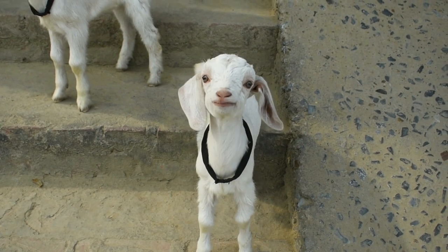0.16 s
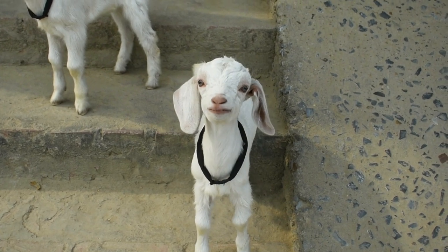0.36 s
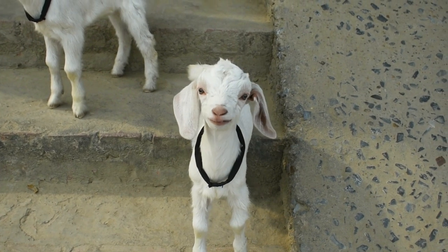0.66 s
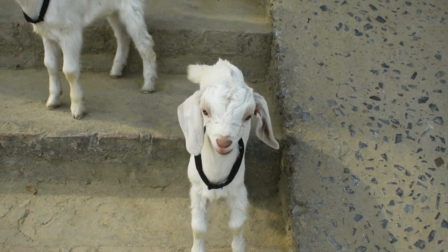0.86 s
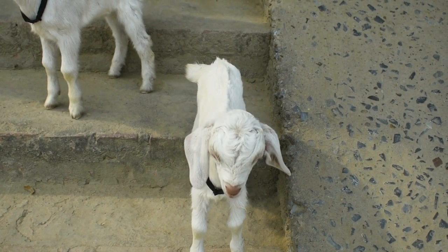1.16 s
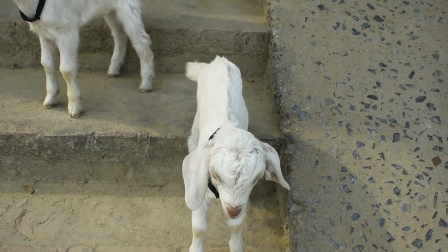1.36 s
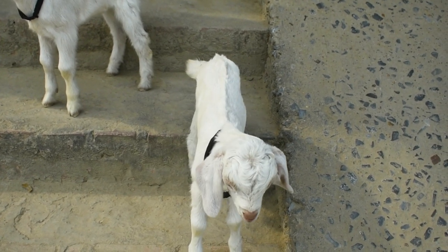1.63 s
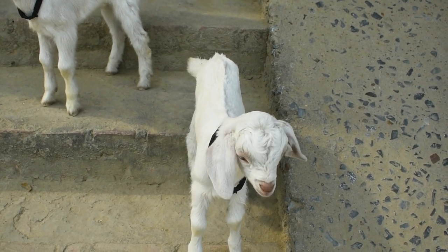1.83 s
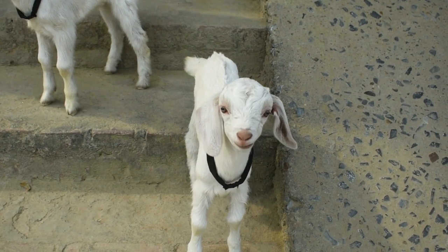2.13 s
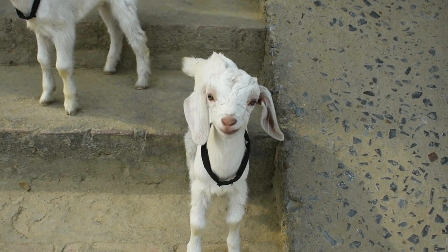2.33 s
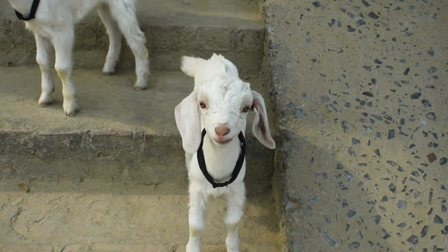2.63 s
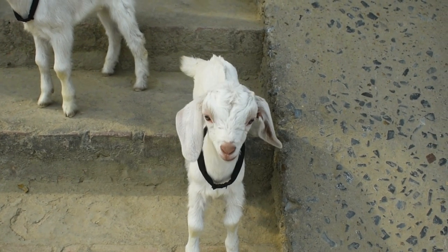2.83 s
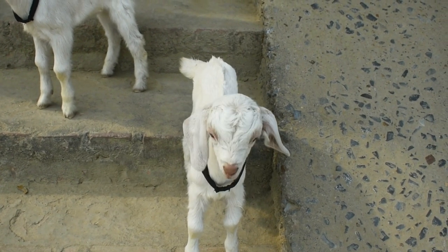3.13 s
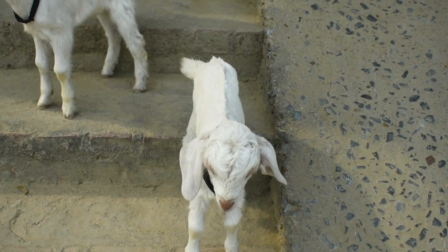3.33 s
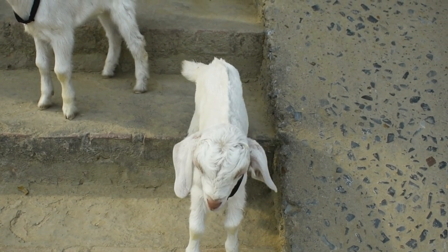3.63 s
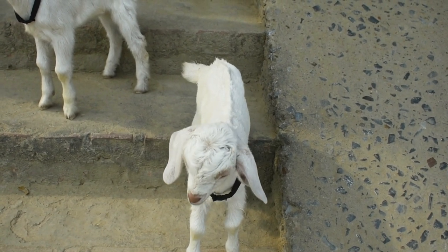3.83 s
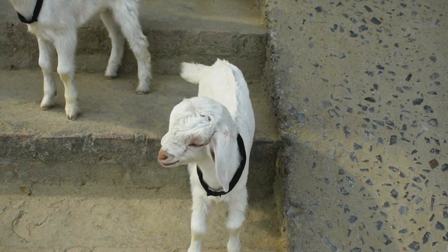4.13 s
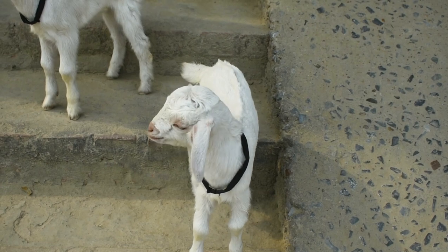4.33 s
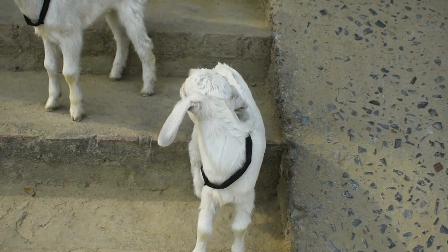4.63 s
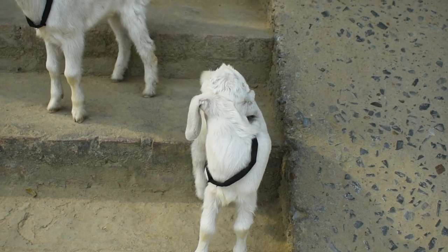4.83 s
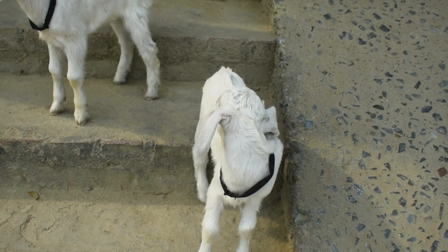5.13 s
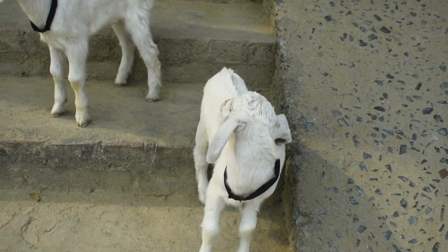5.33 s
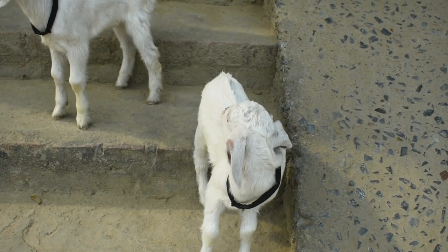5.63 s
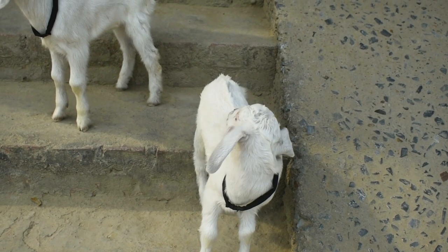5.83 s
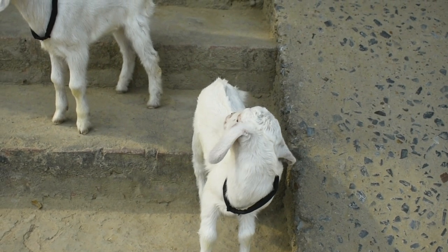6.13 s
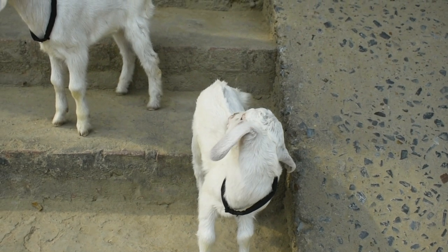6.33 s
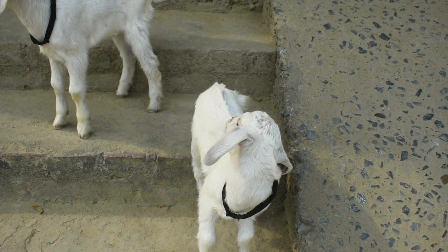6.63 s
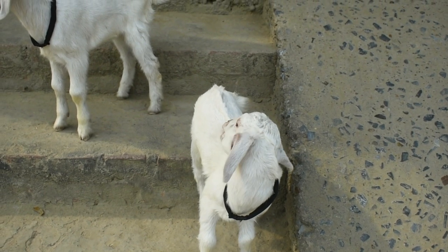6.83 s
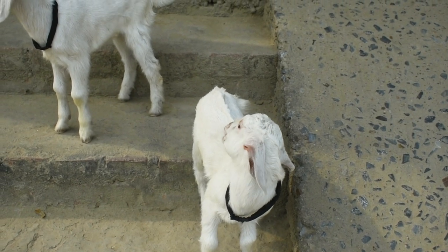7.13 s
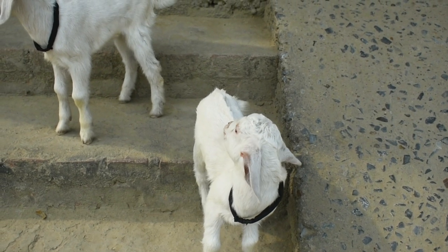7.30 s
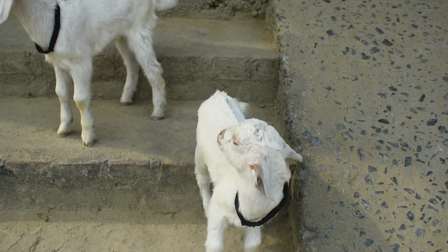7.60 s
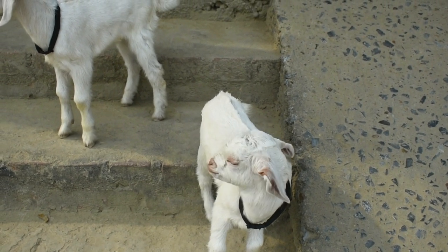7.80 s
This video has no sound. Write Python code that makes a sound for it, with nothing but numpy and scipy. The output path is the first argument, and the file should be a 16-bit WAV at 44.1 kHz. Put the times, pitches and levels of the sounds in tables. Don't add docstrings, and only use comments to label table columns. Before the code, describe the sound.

A kid goat calls three times near a camera microphone, with several seconds of quiet between. The cries are piercing, bright and nasal, cracking at the start, trembling, then sagging into slow creaky pulses. Short concrete reflections follow each. Around them lie constant faint hiss, soft muffled bumps of hands on the camera, and weak high bird whistles and trills far away.

```python
import sys
import numpy as np
from scipy import signal
from scipy.fft import rfft, irfft, next_fast_len
from scipy.io import wavfile
from scipy.ndimage import uniform_filter1d, map_coordinates

SR = 44100
rng = np.random.default_rng(int(sys.argv[2]) if len(sys.argv) > 2 else 0)


def amp(db):
    return 10 ** (np.asarray(db, float) / 20)


def write(x):
    x = np.atleast_2d(x).T
    wavfile.write(sys.argv[1], SR, np.round(np.clip(x, -1, 1) * 32767).astype(np.int16))


N = 351036

# (frequency [Hz], density [dB per Hz])
HISS_SPECTRUM = [(20, -29.5), (33, -28), (101, -14.5), (400, -3.5), (900, -2), (2570, -6), (11300, -17),
                 (15600, -23.5)]
# (time [s], peak level [dB])
KNOCKS = [(0.021, -45), (0.343, -42), (0.38, -44), (0.714, -41), (0.775, -41), (0.812, -43), (1.134, -38.5),
          (1.326, -48), (1.45, -44), (1.715, -42.5), (1.957, -47), (2.051, -36.5), (2.729, -39),
          (2.759, -38), (2.779, -44), (3.473, -54), (6.019, -51), (6.114, -43), (6.42, -54), (6.631, -45),
          (6.884, -43), (6.984, -44), (7.144, -47), (7.527, -45)]
# (time [s], length [s], start pitch [Hz], end pitch [Hz], level [dB])
BIRD_WHISTLES = [(1.244, 0.045, 3550, 3260, -60), (1.227, .04, 5900, 5900, -66.5),
                 (1.698, 0.033, 3250, 3200, -60), (3.867, 0.025, 3550, 3270, -56),
                 (3.949, .03, 3180, 3100, -63), (3.991, 0.064, 2586, 2570, -53),
                 (5.94, 0.075, 2830, 2750, -50.5), (6.871, 0.031, 3400, 3300, -53),
                 (6.99, 0.046, 2560, 2520, -57.5)]
# (time [s], length [s], start pitch [Hz], end pitch [Hz], level [dB])
BIRD_TRILLS = [(.01, 0.094, 3730, 3530, -57), (0.117, 0.09, 6580, 5920, -57),
               (0.134, 0.16, 5250, 4400, -54), (.5, .07, 3180, 3200, -60), (.87, 0.085, 3810, 3670, -58),
               (1.03, 0.24, 3780, 3760, -58), (1.043, 0.15, 3300, 3330, -59),
               (1.36, 0.092, 3200, 3170, -63), (1.587, 0.067, 3280, 3230, -57),
               (2.85, 0.037, 3820, 3670, -57), (5.72, .08, 3170, 3140, -59), (5.85, 0.097, 3700, 3000, -56)]
# (delay [s], level [dB])
STEP_ECHOES = [(.0024, -22), (.0068, -15.5), (0.011, -11), (.021, -24), (.034, -28.5)]

# (time [s], pitch [Hz])
BLEAT_PITCH = [
    [(1.846, 778), (1.878, 703), (1.933, 767.6), (2.121, 834.5), (2.374, 787), (2.48, 763.5),
     (2.596, 714.5), (2.678, 645.5), (2.719, 495.6)],
    [(4.193, 788), (4.23, 736.4), (4.345, 758.3), (4.434, 774.3), (4.62, 756), (4.722, 732.3), (4.738, 700),
     (4.778, 553)],
    [(7.132, 561), (7.18, 547), (7.23, 687.5), (7.326, 724.4), (7.423, 751.6), (7.537, 751.4), (7.706, 726),
     (7.758, 652.5), (7.79, 541)],
]
# (time [s], depth [Hz], fall [s], recovery [s])
QUAVERS = [(1.94, 107, 0.014, 0.013), (1.985, 53.5, 0.017, 0.011), (2.057, 93, 0.011, 0.06),
           (2.204, 108, 0.046, 0.028), (2.306, 76, 0.03, 0.026), (2.527, 42, 0.0076, 0.014),
           (2.575, 12.9, 0.0092, 0.0095), (2.657, 16.3, 0.0086, 0.0093), (2.614, 36.4, 0.0089, 0.085),
           (4.204, 122, 0.022, 0.014), (4.285, 49, 0.018, 0.025), (7.263, 54.4, 0.016, 0.033),
           (7.358, 34, 0.0092, 0.045), (7.47, 29, 0.02, 0.021)]
# (time [s], length [s], timing jitter [share of a cycle], weakening of every second pulse [0-1])
VOICE_CRACKS = [
    (1.86, .018, .03, .7),
    (1.928, .022, .014, .35),
    (1.966, .006, .03, .2),
    (2.155, .018, .012, .15),
    (4.18, .03, .025, .85),
    (7.14, .014, .01, .1),
    (7.184, .012, .014, .15),
]
# (time [s], level [dB], mouth resonance [Hz])
BLEAT_EFFORT = [
    [(1.8, -64, 6150), (1.896, -20, 5780), (1.968, -26, 5430), (2.02, -18, 5440), (2.392, -19, 5370),
     (2.504, -18, 5360), (2.54, -17, 5725), (2.678, -24, 5630), (2.735, -33.5, 5960)],
    [(4.12, -71, 5310), (4.16, -37.5, 6000), (4.258, -18.5, 5340), (4.292, -21.5, 5700),
     (4.33, -18.5, 5500), (4.626, -12.5, 5500), (4.726, -15.5, 5390), (4.8, -29, 6500)],
    [(7.1, -65, 5710), (7.148, -36, 6400), (7.226, -23.5, 5500), (7.372, -19, 5540), (7.43, -15.5, 5370),
     (7.47, -17.5, 5640), (7.542, -15, 5340), (7.752, -19.5, 5680), (7.812, -31.5, 6440)],
]
# (lips open [s], hum [dB], nasal leak [dB], side cavity [dB], mid throat [dB])
BLEATS = [
    (1.861, -47.5, -32.5, -28, -11),
    (4.179, -52, -35.5, -38, -5),
    (7.157, -48.5, -44, -19.5, -7.5),
]

NOSE_MODES = [(864, 83, 0)]
LOW_THROAT_MODES = [(1629, 306, 5)]
CAVITY_MODES = [(1907, 1120, 0.024), (3180, 1800, 0)]
MID_THROAT_MODES = [(3975, 120, 0)]
MOUTH_MODES = [(-150, 920, 4), (543, 1160, 0)]
TOP_MODES = [(7750, 520, -19), (10380, 600, -35), (12250, 2700, -28), (13900, 1000, -40)]
HUM_MODES = [(700, 310, -4), (1250, 400, -8), (2770, 540, 4.5), (3600, 600, -3.5), (4400, 680, 0)]


def unit(x):
    return x / np.sqrt(np.mean(x ** 2) + 1e-20)


def wobble(rate, t):
    return map_coordinates(rng.standard_normal(int(N * rate / SR) + 4), [t * rate])


def filtered(x, response):
    m = next_fast_len(N + SR // 2)
    return irfft(rfft(x, m) * response(np.fft.rfftfreq(m, 1 / SR)), m)[:N]


def edge(f, hz, order):
    u = 1j * f / hz + 1e-9
    u = u if order > 0 else 1 / u
    return (1 + 1.214 * u + u * u) ** -abs(order)


def tail(t60, gap):
    t = np.arange(SR // 4) / SR
    noise = rng.standard_normal(len(t)) * amp(-60 * t / t60) * (t > gap)
    return noise / np.linalg.norm(noise)


def hiss():
    rest_db, swell_db, swell_s = -78, -35, 0.14
    t = np.arange(N) / SR
    f, density_db = np.transpose(HISS_SPECTRUM)

    def air_response(hz):
        return amp(np.interp(np.log(hz + 1), np.log(f + 1), density_db))

    air = filtered(rng.standard_normal(N), air_response)
    rumble = filtered(rng.standard_normal(N), lambda hz: (hz / 110) ** 1.14 / (1 + (hz / 120) ** 4))
    grip = amp(rest_db)
    for s, db in KNOCKS:
        grip = grip + amp(db + swell_db) * np.exp(-((t - s) / swell_s) ** 2)
    air = amp(-49 + 0.16 * wobble(2.6, t)) * unit(air)
    return air + grip * amp(1.7 * wobble(6.7, t)) * unit(rumble)


def knocks():
    swing_hz = 155.4
    out, t = np.zeros(N + SR), np.arange(SR // 20) / SR
    u = t * swing_hz - 1.6
    swing = np.exp(-(u / 0.43) ** 2) * np.sin(2 * np.pi * u)
    for s, db in KNOCKS:
        out[round(s * SR):][:len(t)] += amp(db - 1.0) * swing
    return out[:N]


def birds():
    whistle_trill, far_trill = .17, .7
    near, far = np.zeros((2, N + SR))
    calls = [(*row, whistle_trill) for row in BIRD_WHISTLES]
    calls += [(*row, far_trill) for row in BIRD_TRILLS]
    for s, length, start_hz, end_hz, db, trill in calls:
        t = np.arange(round(length * SR)) / SR
        glide = start_hz + (end_hz - start_hz) * t / length
        hz = glide * (1 + 0.045 * trill * wobble(150.5, t))
        swell = np.sin(np.pi * t / length) ** 0.28
        flutter = 1 - trill * np.cos(np.pi * 30 * t) ** 2
        level = amp(db + 7.5 + 2 * wobble(67, t))
        call = level * swell * flutter * np.sin(2 * np.pi * np.cumsum(hz) / SR)
        near[round(s * SR):][:len(t)] += (1 - trill) * call
        far[round(s * SR):][:len(t)] += 1.1 * trill * call
    return near[:N] + signal.fftconvolve(far, tail(t60=.16, gap=0))[:N]


def steps(x):
    concrete = amp(-21) * tail(t60=.1, gap=.004)
    for delay, db in STEP_ECHOES:
        concrete[round(delay * SR)] += amp(db)
    walls = amp(-11.0) * tail(t60=0.29, gap=0.022)
    dull = filtered(x, lambda f: edge(f, 3650, order=1))
    return (signal.fftconvolve(x, concrete) + signal.fftconvolve(dull, walls))[:N]


def fold_closures(pitch):
    scoop_s, scoop_per_s = .085, 5.5
    collapse_s, collapse_per_s = .1, 14.5
    creak_lead_s, creak_s = .035, .13
    calm, wild = .002, .16
    first, last = pitch[0][0], pitch[-1][0]
    t = np.arange(first - scoop_s, last + collapse_s, 1 / SR)
    sag = np.zeros(len(t))
    for s, depth, fall, back in QUAVERS:
        sag += depth * np.exp(-((t - s) / np.where(t < s, fall, back)) ** 2)
    ends = np.exp(-scoop_per_s * np.maximum(first - t, 0) - collapse_per_s * np.maximum(t - last, 0))
    hz = uniform_filter1d(np.interp(t, *np.transpose(pitch)) * ends - sag, size=485)
    hz = hz * (1 + .0026 * wobble(60, t))

    cycles = np.cumsum(hz) / SR
    when = np.interp(np.arange(1, int(cycles[-1])), cycles, t)
    rate, sag = np.interp(when, t, hz), np.interp(when, t, sag)

    jitter = .0012 * (1 + sag / 70 + 3 * (when < first))
    creak = (when - last + creak_lead_s) / creak_s
    jitter = np.where(creak > 0, calm * (wild / calm) ** np.clip(creak, 0, 1), jitter)
    skip = np.zeros(len(when))
    for s, length, shake, weak in VOICE_CRACKS:
        inside = (when > s) & (when < s + length)
        jitter[inside], skip[inside] = shake, weak
    chance = rng.standard_normal((len(when), 2))
    every_second = np.arange(len(when)) % 2
    size = amp(20 * jitter * chance[:, 0]) * (1 - skip * every_second)
    return when + jitter * chance[:, 1] / rate, rate, size, sag / 100


def ring(when, size, modes, shift_hz, opening):
    first = np.ceil(when * SR).astype(int)[:, None] + np.arange(400)
    t = first / SR - when[:, None]
    wave = 0
    for k, (hz, width, db) in enumerate(modes):
        decay = np.exp(-np.pi * width * t) * np.sqrt(4 * np.pi * width)
        wave = wave + (-1) ** k * amp(db) * decay * np.sin(2 * np.pi * (hz + shift_hz[:, None]) * t)
    wave = wave * (1 - np.exp(-t / opening)) * size[:, None]
    return np.bincount(first.ravel(), wave.ravel(), N + SR)[:N]


def bleat(pitch, effort, open_s, hum_db, nose_db, cavity_db, mid_db):
    when, rate, size, sag = fold_closures(pitch)

    s, effort_db, centre_hz = np.transpose(effort)
    db = np.interp(when, s, effort_db) - 1.5 * sag
    db = db - 390 * np.maximum(when - s[-1], 0) - 500 * np.maximum(s[0] - when, 0)
    mouth_hz = np.interp(when, s, centre_hz) + 150 * sag + 110 * wobble(30, when)

    shut = np.clip((open_s - when) / .03, 0, 1)
    settled = np.clip((when - open_s) / .075, 0, 1)
    slack = np.clip((794 - rate) / 214, 0, 1) * settled

    spent_db = -200 * np.maximum(when - pitch[-1][0], 0)
    low_hz = (205 * slack - 300 * (1 - settled)) * amp(2 * spent_db)
    low_db = -12 + 3 * slack + 8 * shut + spent_db
    cavity_db = cavity_db + 4 * shut - 9 * sag + spent_db
    mid_db = mid_db - 7 * slack - 10 * shut - 7 * (1 - settled) + spent_db
    nose_db = nose_db - 5 * sag + 15 * shut

    hum_rise = np.clip((when - open_s + 0.075) / 0.036, 0, 1)
    humming = shut * hum_rise * amp(hum_db + 4 * wobble(70, when))
    hum = ring(when, size * humming / np.sqrt(rate), HUM_MODES, 0 * when, opening=.0003)

    size = size * amp(db + .6 * wobble(30, when)) / np.sqrt(rate)
    nose = ring(when, size * amp(nose_db), NOSE_MODES, -100 * shut, opening=.0008)
    low_size = size * amp(low_db + 1.1 * wobble(30, when))
    throat = ring(when, low_size, LOW_THROAT_MODES, low_hz - 250 * shut, opening=0.00081)
    cavity_size = size * amp(cavity_db + 5 * wobble(35, when))
    throat += ring(when, cavity_size, CAVITY_MODES, -150 * shut, opening=0.00058)
    mid_size = size * amp(mid_db + 4.6 * wobble(28, when))
    mouth = ring(when, mid_size, MID_THROAT_MODES, -900 * shut, opening=0.0008)
    mouth += ring(when, size * amp(-5 * shut), MOUTH_MODES, mouth_hz - 600 * shut, opening=.0001)
    top_size = size * amp(1.9 * wobble(25, when) - 2.4 * shut)
    top = ring(when, top_size, TOP_MODES, 250 * wobble(35, when), opening=.00006)
    return np.array([nose, throat, mouth, top, hum])


def goat():
    parts = np.zeros((5, N))
    for pitch, effort, settings in zip(BLEAT_PITCH, BLEAT_EFFORT, BLEATS):
        parts += bleat(pitch, effort, *settings)
    nose, throat, mouth, top, hum = parts
    voice = filtered(nose, lambda f: edge(f, 680, order=-2))
    voice += filtered(throat, lambda f: edge(f, 1110, order=-2) * edge(f, 3600, order=1))
    voice += filtered(mouth, lambda f: edge(f, 3140, order=-1) * edge(f, 7140, order=2))
    voice += filtered(top, lambda f: edge(f, 6700, order=-1) * edge(f, 14300, order=2))
    voice += hum
    gate = np.sqrt(np.abs(uniform_filter1d(voice ** 2, size=24)))
    breath = filtered(rng.standard_normal(N), lambda f: 1 / (1 + ((f - 5600) / 2600) ** 2))
    return voice + amp(-34) * gate * unit(breath)


def scene():
    kid = goat()
    mono = hiss() + knocks() + birds() + steps(kid) + kid
    return np.array([mono, mono])


def low_pass(x):
    return signal.sosfilt(signal.butter(12, 15750, fs=SR, output="sos"), x)


def record(dry):
    soft = dry / (1 + np.abs(dry / .96) ** 8) ** (1 / 8)
    return low_pass(soft)


dry = scene()
out = record(dry)
write(out)
```